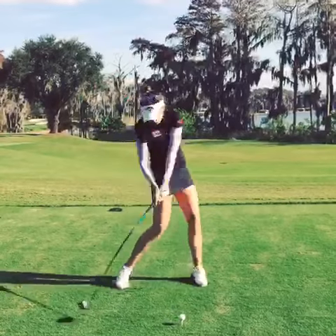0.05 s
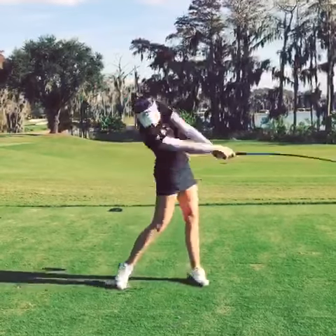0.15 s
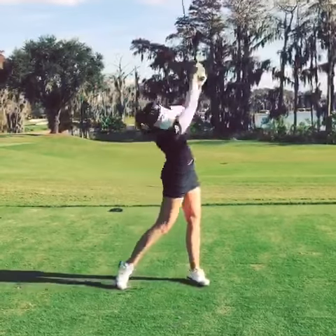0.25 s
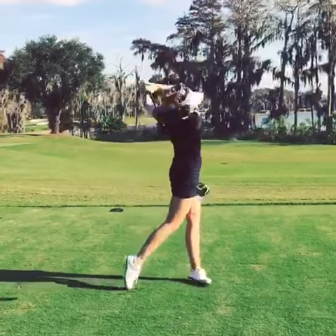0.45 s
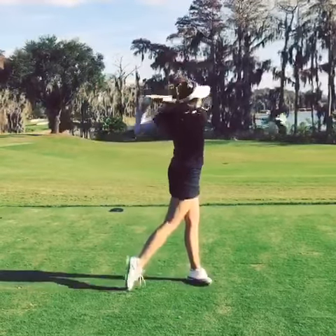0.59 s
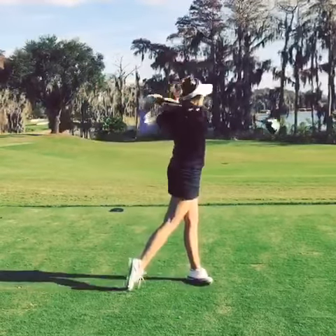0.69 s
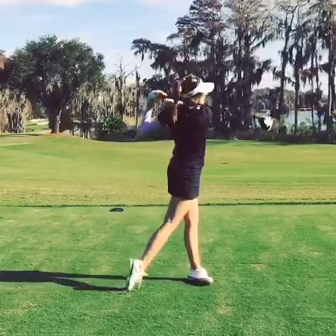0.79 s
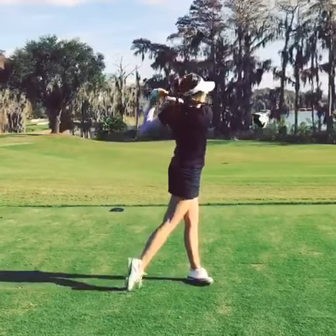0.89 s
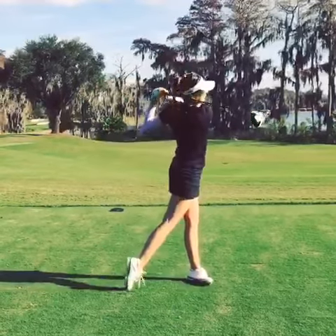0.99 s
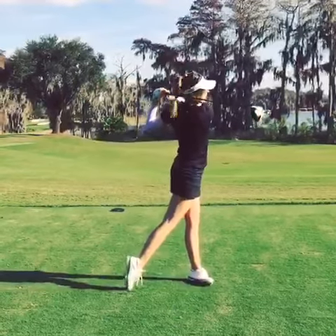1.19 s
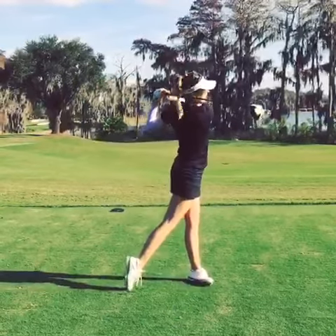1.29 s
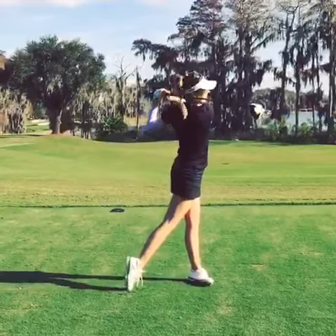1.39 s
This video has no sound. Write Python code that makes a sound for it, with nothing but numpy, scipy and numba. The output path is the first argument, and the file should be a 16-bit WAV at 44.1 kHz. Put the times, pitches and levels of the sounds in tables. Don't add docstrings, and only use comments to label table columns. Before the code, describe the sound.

A golf driver hits a ball outdoors. Faint low rumble and soft air come first; from about 0.12 s an airy whistle rises quickly. At 0.23 s a very loud, bright metallic crack overloads the phone microphone, ringing for a few hundredths of a second. Patchy, hissy, slightly ringing tree echoes follow until about 0.6 s, with a faint low thud near 0.45 s, then quiet swelling rumble to about 1.4 s.

```python
import sys
import numpy as np
from scipy import signal
from scipy.fft import rfft, irfft
from scipy.io import wavfile
from scipy.ndimage import uniform_filter1d
from numba import njit

SR = 44100
rng = np.random.default_rng(int(sys.argv[2]) if len(sys.argv) > 2 else 0)


def magnitude_from_level(level_db):
    exponent = np.asarray(level_db, float) / 20
    return 10 ** exponent


def pcm_store(signal):
    levels = np.round(np.clip(np.atleast_2d(signal), -1, 1) * 32767)
    wavfile.write(sys.argv[1], SR, levels.astype(np.int16).T)


N = 63945
STRIKE_S = 0.2277


def unit(x):
    return x / np.sqrt(np.mean(x ** 2))


@njit
def bandpass(x, centre_hz, share):
    y, b, l = np.empty(len(x)), 0., 0.
    for i in range(len(x)):
        g = np.tan(np.pi * centre_hz[i] / SR)
        v = (b + g * (x[i] - l)) / (1 + g * (g + share))
        b, l, y[i] = 2 * v - b, l + 2 * g * v, share * v
    return y


def noise_band(centre_hz, share):
    centre_hz = centre_hz + np.zeros(N)
    once = bandpass(rng.standard_normal(N), centre_hz, share)
    return unit(bandpass(once, centre_hz, share))


def coloured_noise(spectrum):
    point_hz, point_db = np.array(spectrum).T
    hz = np.maximum(np.fft.rfftfreq(N, 1 / SR), 1)
    gain_db = np.interp(np.log(hz), np.log(point_hz), point_db, left=-60)
    return unit(irfft(rfft(rng.standard_normal(N)) * magnitude_from_level(gain_db), N))


def wander(rate_hz):
    hold = int(SR / rate_hz)
    steps = np.repeat(rng.standard_normal(N // hold + 1), hold)
    return unit(uniform_filter1d(uniform_filter1d(steps, hold), hold)[:N])


def burst(since_s, t60_s, rise_s):
    u = np.maximum(since_s, 0)
    return (1 - np.exp(-u / rise_s)) * magnitude_from_level(-60 * u / t60_s)


def switch(since_s, width_s):
    return 1 / (1 + np.exp(-np.clip(since_s / width_s, -30, 30)))


# freq_hz, density_db_per_hz
AIR_SPECTRUM = [(15, -45.5), (25, -11.5), (79, -1.5), (129, -15), (198, -28), (598, -38), (1140, -38.5),
                (2360, -44.5), (15500, -57)]
# time_s, level_db
RUMBLE_SWELL = [(0, -47), (.12, -60.5), (.22, -46.5), (.3, -60.5), (.48, -59), (.56, -54), (.8, -55.5),
                (.92, -60.5), (1.15, -54.5), (1.28, -56.5), (1.42, -48)]


def air(t):
    level_db, rumble_top_hz, flicker_db, flicker_hz = -51.5, 150, 1.5, 9
    x = magnitude_from_level(level_db) * coloured_noise(AIR_SPECTRUM)
    rumble = signal.sosfiltfilt(signal.butter(2, rumble_top_hz, fs=SR, output="sos"), x)
    hiss = x - rumble
    swell_db = np.interp(t, *np.array(RUMBLE_SWELL).T)
    return hiss + unit(rumble) * magnitude_from_level(swell_db + flicker_db * wander(flicker_hz))


# time_s, level_db, pitch_hz
SWING_PATH = [
    (.1, -83, 380),
    (0.136, -66, 438),
    (0.166, -47.5, 663),
    (0.193, -38, 839),
    (.217, -31, 922),
    (.224, -39, 880),
    (.25, -49.5, 593.6),
    (.3, -56.5, 450),
    (.38, -66, 360),
]
# freq_hz, density_db_per_hz
HEAD_HISS = [(760, -33.5), (1300, -2.5), (1810, -5.5), (4750, -12), (14400, -24.5), (15500, -27)]


def swish(t):
    tight_share, loose_share = 0.13, 0.47
    hiss_db, hiss_growth, effort_s = -6, 1.2, 0.023
    time_s, level_db, pitch_hz = np.array(SWING_PATH).T
    level_db = np.interp(t, time_s, level_db, left=-120, right=-120)
    pitch_hz = np.interp(t, time_s, pitch_hz)
    whistle = np.where(t < STRIKE_S, noise_band(pitch_hz, tight_share), noise_band(pitch_hz, loose_share))
    undertone = magnitude_from_level(-5.5) * noise_band(0.72 * pitch_hz, 0.8)
    wake = magnitude_from_level(-11) * noise_band(180, 0.75)
    effort_db = uniform_filter1d(level_db, int(effort_s * SR))
    hiss_level_db = effort_db + hiss_db + (hiss_growth - 1) * (effort_db - level_db.max())
    return magnitude_from_level(level_db) * (whistle + undertone + wake) + magnitude_from_level(hiss_level_db) * coloured_noise(HEAD_HISS)


# freq_hz, level_db, t60_s
SHELL_MODES = [(2978.6, -14.5, .16), (4036, -12, .08), (6124, -21.5, 0.13), (7450, -20.5, .08),
               (8250, -19.5, .08), (8560, -24.5, 0.047), (9200, -17.5, 0.094), (9800, -16, 0.042),
               (11440, -17.5, 0.033), (11550, -25.5, .08), (12300, -23, .062), (13900, -6.5, 0.044)]
# freq_hz, level_db, t60_s
FACE_MODES = [(1383, -3, .006), (3860, -7, 0.0092), (6350, -6, 0.015)]
# freq_hz, level_db, t60_s
CRACK_BANDS = [(120, -37, .05), (393, -35.5, .05), (1200, -15.5, 0.022), (2400, -17.5, 0.034),
               (4950, -12.5, .035), (8000, -12.5, .05), (11500, -9, .045), (14300, -10, .035)]


def shell_ring(u):
    doppler_share, doppler_s = 0.05, 0.022
    rough_db, rough_hz, wobble_rad = 3.5, 400, 1.1
    sag_s = u + doppler_share * doppler_s * (1 - np.exp(-u / doppler_s))
    ring = 0
    for hz, level_db, t60_s in SHELL_MODES:
        flutter_db = rough_db * min(hz / 6000, 1) * wander(rough_hz)
        jitter_rad = wobble_rad * min((hz / 7000) ** 2, 1) * wander(rough_hz)
        tone = np.sin(2 * np.pi * hz * sag_s + jitter_rad)
        ring = ring + magnitude_from_level(level_db + flutter_db) * tone * burst(u, t60_s, 0.0035)
    return ring


def strike(t):
    turn_at_s, turn_width_s, turn_db = 0.0255, 0.0012, -11
    u = np.maximum(t - STRIKE_S, 0)
    face = sum(magnitude_from_level(level_db) * np.sin(2 * np.pi * hz * u) * burst(u, t60_s, 0.0001)
               for hz, level_db, t60_s in FACE_MODES)
    crack = sum(magnitude_from_level(level_db) * noise_band(hz, 1.0) * burst(u, t60_s, 0.0003)
                for hz, level_db, t60_s in CRACK_BANDS)
    turn = magnitude_from_level(turn_db * switch(u - turn_at_s, turn_width_s))
    return (crack + shell_ring(u) + face) * turn


def ring_echo(modes, since_s, t):
    return sum(magnitude_from_level(level_db) * np.sin(2 * np.pi * hz * t) * burst(since_s, 2.2 / width_hz, 0.001)
               for hz, width_hz, level_db in modes)


# delay_s, rise_s, t60_s, level_db, top_hz
SCATTERERS = [
    (0.024, .02, 0.15, -28.5, 13000),
    (0.051, 0.02, 0.15, -29.5, 8000),
    (0.108, .03, 0.364, -45.5, 9060),
    (.195, 0.011, 0.55, -48, 13100),
    (.25, 0.035, 0.5, -48.5, 8000),
    (.32, 0.033, 1, -60, 6600),
]
# freq_hz, width_hz, level_db
NEAR_RING_MODES = [(3136, 120, -1.5), (4150, 180, -7.5)]
# freq_hz, width_hz, level_db
WOODS_RING_MODES = [(4130, 240, 1), (6370, 320, 2), (7800, 370, -8)]
# freq_hz, width_hz, level_db
FAR_RING_MODES = [(2900, 160, -6), (3990, 144, -0.5), (5540, 220, 2), (7360, 170, 4), (9720, 190, 2.5)]
# freq_hz, density_db_per_hz
ECHO_SPECTRUM = [(100, -21), (300, -7), (1000, -1), (2500, -3.5), (5000, -3.5), (8000, 1), (12000, -4),
                 (16000, -6)]


def trees(t):
    near_ring_db, back_ring_db, near_late_s = -21, -20, 0.02
    patchy_db, patchy_hz = 1.5, 150
    line_ends_s, line_end_width_s = 0.33, 0.014
    near = magnitude_from_level(near_ring_db) * ring_echo(NEAR_RING_MODES, t - near_late_s, t)
    woods = magnitude_from_level(back_ring_db) * ring_echo(WOODS_RING_MODES, t, t)
    far = magnitude_from_level(back_ring_db) * ring_echo(FAR_RING_MODES, t, t)
    since_s = t - STRIKE_S
    line_end = switch(line_ends_s - since_s, line_end_width_s)
    echoes = 0
    for (delay_s, rise_s, t60_s, level_db, top_hz), heard in zip(SCATTERERS, (near, near, woods, far, far, woods)):
        leaves = burst(since_s - delay_s, t60_s, rise_s) * magnitude_from_level(level_db + patchy_db * wander(patchy_hz))
        if heard is far:
            leaves = leaves * line_end
        ring = signal.fftconvolve(heard, leaves * rng.standard_normal(N))[:N]
        crack = leaves * coloured_noise(ECHO_SPECTRUM)
        dull = signal.butter(2, min(top_hz, 20000), fs=SR)
        echoes = echoes + signal.lfilter(*dull, crack + ring)
    return echoes


def tree_line_thud(t):
    since_s = t - 0.439
    pitch_hz = 278 * (1 + 3 * np.clip(since_s, 0, 0.1))
    return magnitude_from_level(-41.5) * noise_band(pitch_hz, 0.3) * burst(since_s, 0.16, 0.032)


def scene():
    t = np.arange(N) / SR
    return (air(t) + swish(t) + strike(t) + trees(t) + tree_line_thud(t))[None]


def low_pass(x):
    return signal.sosfilt(signal.butter(12, 16310, fs=SR, output="sos"), x)


def record(dry):
    clip, ceiling, top_hz = 0.66, 0.7, 15150
    x = clip * np.tanh((np.abs(dry) / clip) ** 3) ** (1 / 3) * np.sign(dry)
    x = signal.sosfiltfilt(signal.butter(12, top_hz, fs=SR, output="sos"), x)
    return low_pass(np.clip(x, -ceiling, ceiling))


dry = scene()
out = record(dry)
pcm_store(out)
```